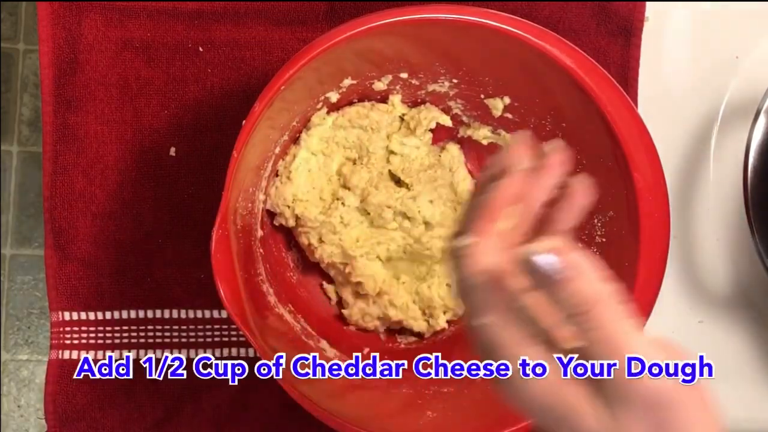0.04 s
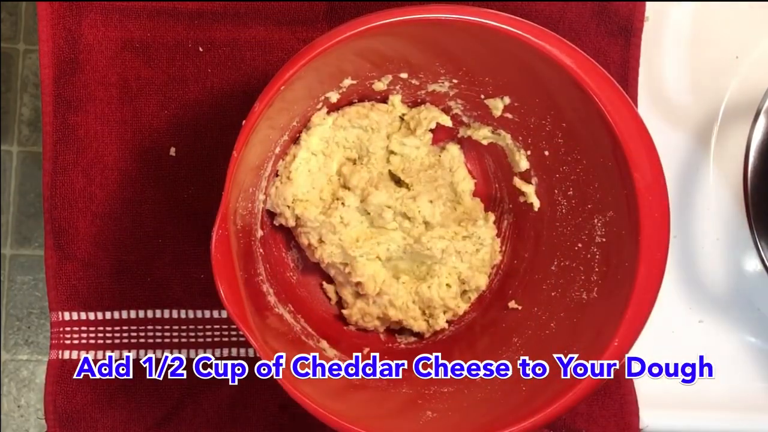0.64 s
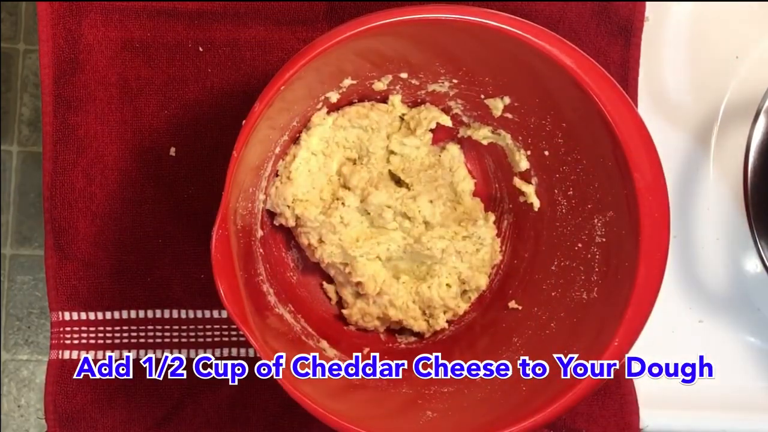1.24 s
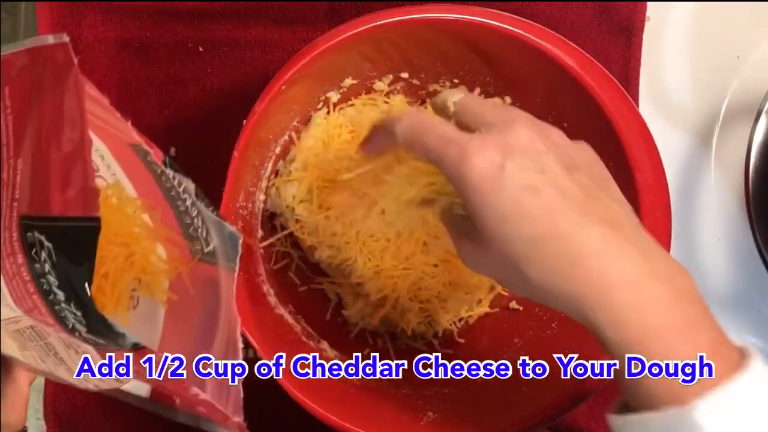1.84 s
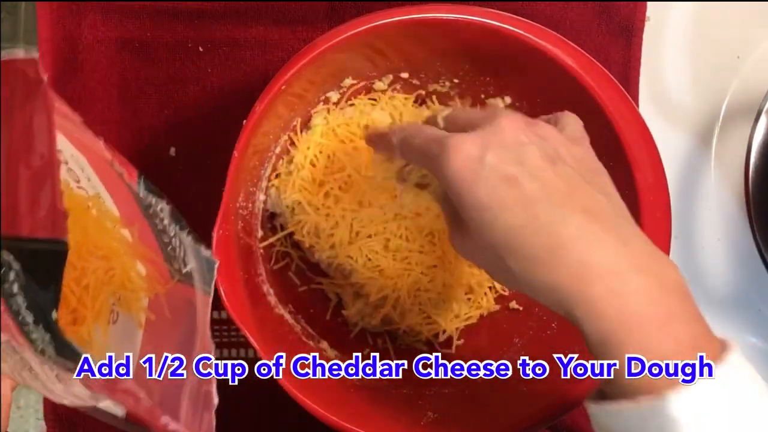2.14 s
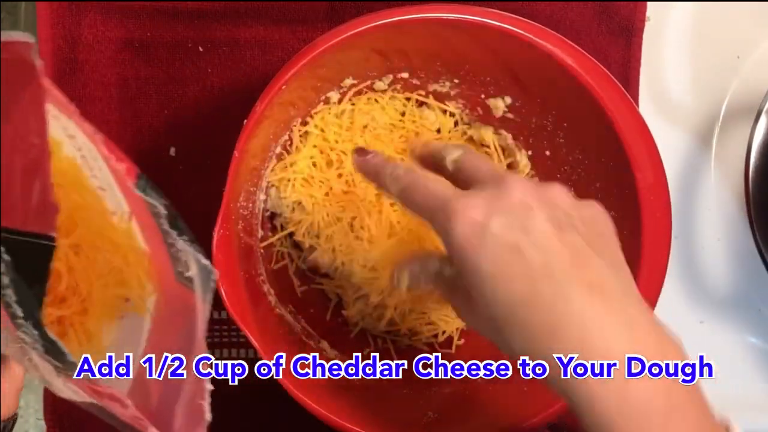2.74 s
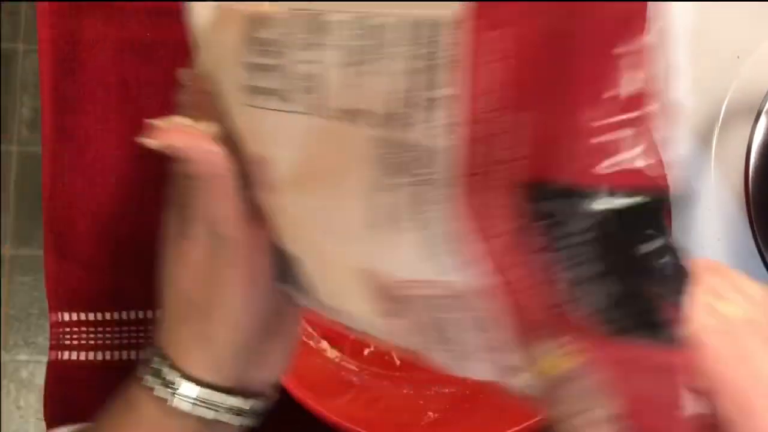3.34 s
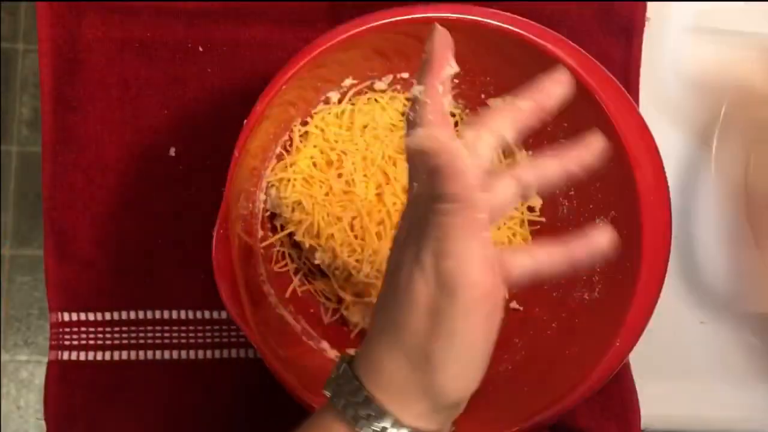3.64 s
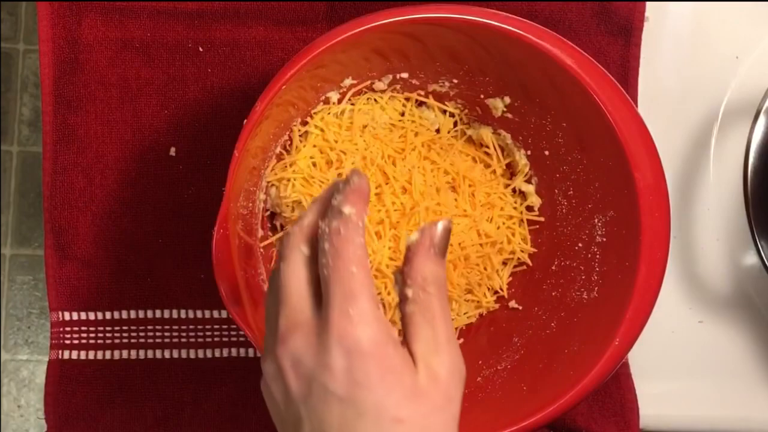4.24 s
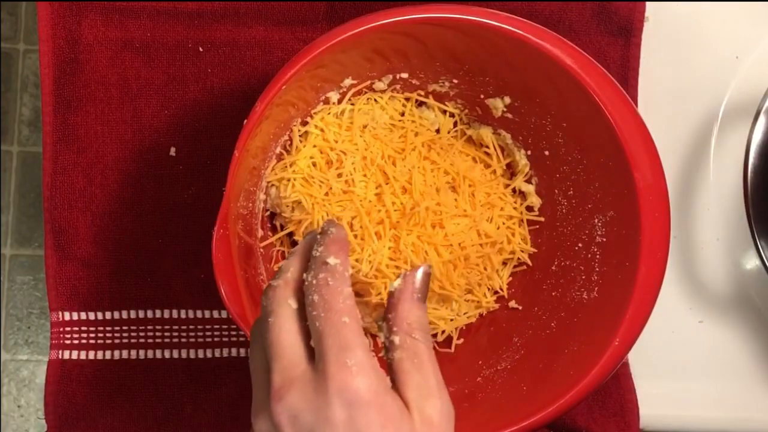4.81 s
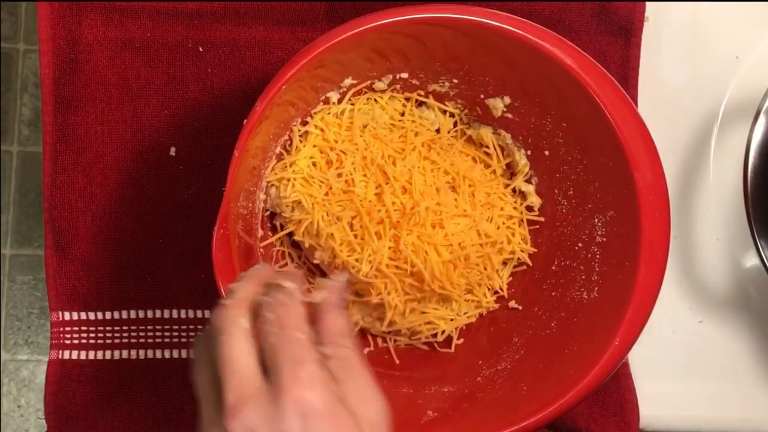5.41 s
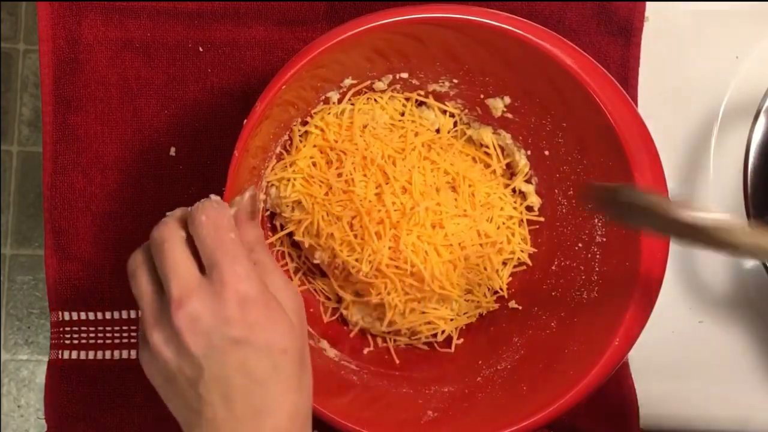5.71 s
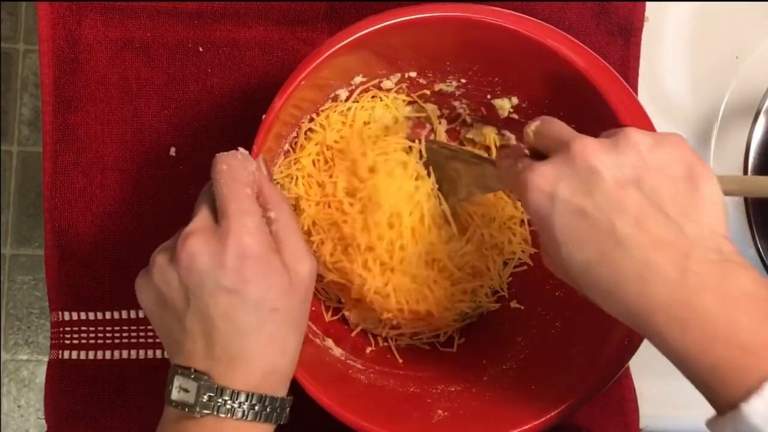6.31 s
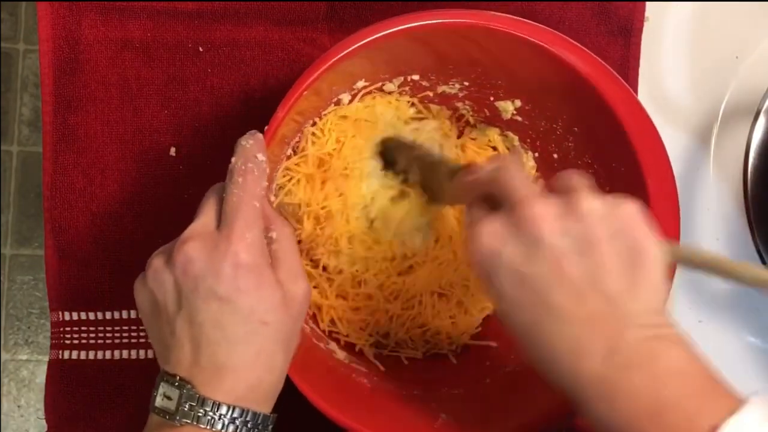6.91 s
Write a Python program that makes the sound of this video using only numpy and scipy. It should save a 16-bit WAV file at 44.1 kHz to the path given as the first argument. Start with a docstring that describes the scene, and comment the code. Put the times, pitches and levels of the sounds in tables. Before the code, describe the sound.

In a small, quiet kitchen, something is set down hard on a counter. Fingers spread shredded cheese over dough with faint rustles and light ticks. A stiff plastic pouch then crinkles in loud, sharp snaps and drops onto the counter. After two more knocks, a wooden spoon starts through sticky dough, softly squelching and scraping a plastic bowl. The microphone is close above the bowl, with a low appliance hum underneath.

```python
"""A stiff pouch of shredded cheese buckles in sharp snaps, each a pop that sets the film shivering.
Before it, in a small quiet kitchen, something is set down hard on the ringing counter, and fingers
drop and spread soft, ticking shreds on dough in a plastic bowl. The pouch is then lifted across and
dropped on the counter. A hand takes hold of the bowl and a wooden spoon starts through the sticky
dough, squelching and scraping the wall. Room air and an appliance hum lie underneath."""
import sys
import numpy as np
from scipy import signal
from scipy.fft import rfft, irfft
from scipy.io import wavfile

SR = 44100
rng = np.random.default_rng(int(sys.argv[2]) if len(sys.argv) > 2 else 0)


def wrap_up_sound(samples):
    """Save the sound to the file named by the first command line argument, as 16-bit audio."""
    columns = np.atleast_2d(samples).T
    # keep every value between -1 and 1, then stretch to whole-number steps
    tamed = np.clip(columns, -1, 1)
    steps = np.round(tamed * 32767).astype(np.int16)
    wavfile.write(sys.argv[1], SR, steps)


N = 306936
TIME = np.arange(N) / SR

# the pouch's big buckles: (time [s], pop level [dB], pitch [Hz], attack [cycles],
# shiver level [dB], crack level [dB])
BUCKLES = [(3.2812, -40, 1150, 1.8, -32.5, -54), (3.2895, -33, 1400, 2.5, -44, -53),
           (3.3074, -16, 2480, 1.8, -19.5, -41), (3.3445, -34, 2420, 1, -38, -33),
           (3.3773, -30, 1550, 1.2, -36, -46), (3.393, -32, 1380, 1.6, -33, -48),
           (3.4038, -29, 1820, 1.4, -34, -47), (3.414, -27, 2000, 1.2, -20.5, -38),
           (3.4206, -17, 2760, 1.4, -18.5, -20.5), (3.4411, -9, 3820, 0.97, -19.5, -17),
           (3.4442, -13, 1550, .8, -20, -20.5), (3.4732, -21, 1760, 1.2, -37.5, -37),
           (3.495, -29, 2000, 1.2, -27, -39), (3.505, -14, 3300, 1.2, -22, -22.5),
           (3.5321, -17.5, 1600, 1.4, -21.5, -25.5), (3.549, -29, 1500, 1.1, -46, -48),
           (3.568, -28, 1390, 2.1, -41, -56.5), (3.574, -18.5, 2400, 1, -27.5, -25),
           (3.6067, -29, 1350, 1.3, -30, -62.5), (3.633, -18.5, 1550, 0.96, -31, -43),
           (3.6403, -30, 2000, 1.1, -26, -34), (3.6786, 2, 4700, .75, -19.5, -21),
           (3.689, -18, 3500, 0.66, -16, -20), (3.7423, -27, 2000, 1.3, -34.5, -38),
           (3.785, 2, 5170, 0.71, -17, -29), (3.8166, -26, 1950, 0.84, -25.5, -52),
           (3.8693, -31, 1120, 1.1, -34, -52), (3.9192, -39, 1170, 1.1, -30, -39),
           (3.9586, -21.5, 1370, 1.14, -26.5, -37.5), (3.999, -29, 1380, 1.5, -35.5, -45),
           (4.0135, -14, 2630, 1.6, -22, -20.5), (4.0195, -15.5, 4000, 1.8, -26, -25),
           (4.121, -16.5, 2880, 1.6, -26.5, -26), (4.1584, -25, 4240, 3.8, -24.5, -27.5),
           (4.2498, -42, 890, 1.2, -35.5, -52), (4.2935, -16.5, 3400, 2.6, -22.5, -18.5),
           (4.3125, -20, 4570, 3.7, -24.5, -23), (4.386, -37, 4840, 2, -40, -37),
           (4.415, -23, 2000, 0.71, -18, -21.5), (4.4335, -35, 3060, 1.2, -23, -27),
           (4.4742, -15, 5100, 1.7, -33, -29), (4.504, -41, 3220, 1.2, -30, -46),
           (4.534, -26.5, 4000, 2, -37, -59), (4.579, -26.5, 2540, 1.8, -26.5, -56),
           (4.627, -42, 2600, 1.5, -37.5, -61)]
# tone of the shivering film: (frequency [Hz], level [dB])
FILM_TONE = [(88, -42.5), (150, 0.5), (328, -6), (716, -2.5), (1500, 0), (1690, 1.5), (2700, 0), (2980, -2),
             (4580, -5.5), (9630, -25.5), (15100, -38), (16000, -40)]
# tone of the bright crack on top: (frequency [Hz], level [dB])
CRACK_TONE = [(2000, -21.5), (5000, 7.5), (9000, 2.5), (15000, -5)]
# the pouch's pass-by, riding the reverb send: (time [s], distance [multiples of the nearest])
POUCH_DISTANCE = [(3.28, 1.7), (3.5, 1.1), (3.75, 1), (4.12, 2), (4.3, 3.2), (4.6, 3)]

def pouch_snaps():
    """Each buckle pops and sets the sheet shivering; tight ones are brighter, distant ones have more room."""
    t, out = np.arange(2048) / SR, np.zeros(N)
    for s, pop_db, hz, cycles, shiver_db, crack_db in BUCKLES:
        shiver = noise(FILM_TONE, len(t), tilt_db=5.5 * np.log2(hz / 2000), ripple_db=3)
        shiver *= burst(t, .0001, .0062)
        crack = noise(CRACK_TONE, len(t)) * burst(t, .0001, .0043)
        buckle = amp(pop_db) * pop(t, hz, cycles, sag=.14)
        sheet = amp(shiver_db) * shiver + amp(crack_db) * crack
        distance = np.interp(s, *np.transpose(POUCH_DISTANCE))
        add(out, s, buckle + sheet)
        add(out, s, distance * kitchen(amp(-17.5) * buckle + amp(-12.5) * sheet, build_s=.0033))
    return butter(out, 2, 130, "high")  # thin film radiates little bass


# how hard the pouch is bent: (time [s], level [dB])
BENDING = [(3.26, -71), (3.34, -52), (3.47, -38), (3.65, -47), (3.88, -52), (4.04, -49), (4.26, -69),
           (4.48, -41), (4.66, -64)]
# film creasing in the hand, faint while fetched and held: (start [s], length [s], level [dB])
HANDLING = [(-.05, 0.28, -57.5), (.36, 2.55, -66), (.63, 0.25, -69), (3.13, .26, -53), (3.36, 0.46, -49),
            (3.78, 0.31, -55.5), (4.29, 0.18, -52)]
# tone of the fine creases: (frequency [Hz], level [dB])
CREASE_TONE = [(1000, -2.5), (2500, -3.5), (4500, -2.5), (7000, -6.5), (10000, -10.5), (15000, -14)]

def pouch_crinkle():
    """Between the snaps, small panels flex with low pops and fine creases crackle."""
    t, pops = np.arange(1024) / SR, np.zeros(N)
    start, end = BENDING[0][0], BENDING[-1][0]
    for when, pitch, softness in rng.random((130, 3)):
        panel = pop(t, 1100 * 3 ** pitch, cycles=1.5, sag=.4)
        add(pops, start + when * (end - start), amp(-12 * softness) * panel)
    bending = amp(np.interp(TIME, *np.transpose(BENDING))) * (TIME > start) * (TIME < end)
    crackle = grains(FILM_TONE, per_s=770, spread_db=6.5, fall_s=.00024)
    flex = bending * (amp(13) * pops + amp(.5) * crackle)
    creases = grains(CREASE_TONE, per_s=1800, spread_db=3, fall_s=.0019)
    creases *= strokes(HANDLING, rise=.043, fall=.15)
    return flex + creases + amp(-6) * kitchen(flex + creases)


# the heap shifting inside the pouch: (start [s], length [s], level [dB])
HEAP_SHIFTS = [(3.28, 0.18, -41.5), (3.46, 0.25, -44), (3.8, 0.16, -63), (4.19, .09, -54),
               (4.54, 0.19, -53.5)]
# its muffled tone: (frequency [Hz], level [dB])
HEAP_TONE = [(70, -20), (150, 3), (300, 10), (480, 1), (900, -13), (2500, -33.5)]

def cheese_slumps():
    """Loose cheese slumps in the pouch with a soft, low tumble."""
    tumble = grains(HEAP_TONE, per_s=400, spread_db=1.5, fall_s=.006, count=6)
    return strokes(HEAP_SHIFTS, rise=.12, fall=.91) * tumble


# hits on the counter and the bowl standing on it: (time [s], thud level [dB], hardness as cutoff [Hz],
# ring level [dB], ring time [factor, low under a resting hand])
HITS = [(0.1929, -22, 3720, -25, .6), (.196, -32.5, 2900, -22, 0.44), (0.2083, -18.5, 670, -18, 0.7),
        (0.467, -43, 686, -53, 0.7), (.545, -39, 600, -45.5, 0.54), (0.649, -47.5, 2240, -54, 0.65),
        (2.252, -44.5, 1000, -58, 0.34), (3.44, -32, 1810, -36.5, 0.55), (4.446, -26, 1680, -53, 0.45),
        (4.461, -30, 1390, -26.5, 0.54), (4.473, -17.5, 204, -19, 0.63), (4.487, -22, 315, -34, 0.67),
        (4.9714, -35, 2870, -41.5, 0.4), (4.978, -31.5, 1380, -36.5, 0.49), (5.021, -45, 1540, -43, 0.6),
        (5.472, -22.5, 560, -24.5, 0.41)]
# the counter's ring: (frequency [Hz], level [dB], t60 [s])
COUNTER_MODES = [(172, -10, .16), (275, 1.5, .25), (350, -2, .2), (436, -14, .2), (495, -9, .21),
                 (576, -9, .18), (657, -8, .12), (856, -23, .24), (711, -11, .16), (818, -11, .15),
                 (1082, -20, .18), (1330, -11, .19), (1825, -17, .23), (1992, -7, .28), (2115, -4, .22),
                 (2200, -10, .13), (3600, -18, .16)]
# tone of the dull thud: (frequency [Hz], level [dB])
THUD_TONE = [(60, -54), (120, -19), (200, 2), (330, -1.5), (700, 0.5), (1000, -4), (1350, -6), (1700, -5),
             (2100, -5), (2700, -10.5), (5000, -22), (15000, -31.5)]
# tone of the hard contact: (frequency [Hz], level [dB])
CLICK_TONE = [(1000, -11), (2500, -0.5), (3600, 4), (4500, -5), (7500, -1), (10000, -2), (15000, -2)]

def counter_knocks():
    """A blow clicks, thuds and rings the counter; soft ones lose the click and the high modes."""
    t, out = np.arange(16384) / SR, np.zeros(N)
    for s, thud_db, hard_hz, ring_db, ring_factor in HITS:
        modes = ring(COUNTER_MODES, t, ring_factor) * (1 - np.exp(-t / .0023))
        thud = noise(THUD_TONE, len(t)) * burst(t, .0005, .014)
        body = amp(ring_db) * modes + amp(thud_db) * thud
        body = butter(body, 3, [120, hard_hz], "band")
        hardness = hard_hz / 3900
        click = noise(CLICK_TONE, len(t), cut_hz=13000 * hardness ** 3) * burst(t, .000067, .004)
        click *= amp(thud_db + 11 * np.log2(hardness))
        radiated = butter(body, 2, 650, "high")
        add(out, s, body + click)
        add(out, s, kitchen(amp(-1) * radiated + amp(-2) * click, build_s=.0023))
    return out


# fingers rubbing off crumbs, then sprinkling and spreading: (start [s], length [s], level [dB])
FINGER_STROKES = [(.06, 0.11, -59), (1.4, 0.088, -61.5), (1.52, 0.14, -55.5), (1.73, 0.33, -58.5),
                  (2.15, 0.13, -62), (2.32, 0.072, -55), (2.55, 0.57, -57)]
# tone of rustling shreds: (frequency [Hz], level [dB])
SHRED_TONE = [(410, -60), (700, -3), (760, -12), (1350, -12), (2000, -1.5), (3100, -3.5), (4210, -7.5),
              (5800, -14.5), (11600, -31.5), (15000, -59)]

def cheese_spreading():
    """Soft shreds slide over one another under the fingers, and single ones patter down."""
    slide = grains(SHRED_TONE, per_s=3200, spread_db=2.5, fall_s=.0011)
    patter = amp(-2) * grains(SHRED_TONE, per_s=40, spread_db=-1.5, fall_s=.0011)
    return strokes(FINGER_STROKES, rise=.17, fall=.13) * (slide + patter)


# the hand, then the spoon, leaning into the dough: (start [s], length [s], level [dB])
PRESSES = [(1.42, 0.91, -59), (2.42, 0.72, -53), (6.08, 0.038, -51), (6.18, .11, -51)]
# tone of yielding dough: (frequency [Hz], level [dB])
DOUGH_TONE = [(80, -56), (150, -3), (200, -1), (270, -18), (600, -13), (1500, -17), (6000, -33.5)]

def dough_rub():
    """The dough gives under pressure with a dull, low rub."""
    rub = grains(DOUGH_TONE, per_s=250, spread_db=1.5, fall_s=.0072)
    return strokes(PRESSES, rise=.26, fall=.088) * rub


# spot ticks: (time [s], level [dB], pitch [Hz], edge trim [dB])
SPOT_TICKS = [(1.3921, -34, 2830, -1), (1.4666, -39.5, 3060, -13), (1.492, -46, 3750, -3),
              (1.5352, -40, 2920, -16), (1.5425, -41, 2460, -11), (1.567, -32.5, 2330, -22),
              (1.5741, -30, 3280, -25), (1.607, -35.5, 2650, 0), (1.613, -40, 3300, -8),
              (1.6357, -34.5, 2720, -15), (1.643, -39, 3600, -9), (1.6795, -38, 2520, -16),
              (1.8855, -38.5, 2190, -10), (1.931, -40, 2900, -5), (1.9852, -45, 2440, 1),
              (2.017, -39, 2630, -16), (2.0454, -36, 2980, -23), (2.1077, -36.5, 4400, -7),
              (2.173, -30.5, 2760, -27), (2.235, -39, 2340, -18), (2.341, -41, 1930, -10),
              (2.412, -35, 2960, -1.5), (2.4188, -38.5, 1980, 6), (2.583, -34.5, 2700, -22),
              (2.881, -33, 2600, -1), (5.074, -40, 8500, -10), (6.0635, -35.5, 6900, -16),
              (6.208, -46, 7400, 3), (6.239, -40, 7000, 8), (6.3116, -44, 6000, -3), (6.358, -47, 7000, 7),
              (6.391, -37, 11000, 1), (6.439, -38, 11100, -11), (6.5197, -48, 2000, 4),
              (6.6423, -42, 9000, 7), (6.6912, -32.5, 4760, 0.5), (6.766, -40, 1360, 5),
              (6.798, -39.5, 3060, 3.5), (6.875, -43, 11000, 1), (6.9114, -38, 12000, 3),
              (6.9309, -36, 5500, 6)]
# tone of wet threads and shreds parting, here and under the spoon: (frequency [Hz], level [dB])
THREAD_TONE = [(1000, 3), (4500, -1.5), (10000, -1), (15000, -10)]

def small_ticks():
    """Shreds, pouch and dough tick: a tiny pop with a crisp rustle and a dry, bright edge."""
    t, out = np.arange(1024) / SR, np.zeros(N)
    for s, db, hz, edge_db in SPOT_TICKS:
        rustle = amp(-8.5) * noise(SHRED_TONE, len(t), tilt_db=3, ripple_db=3) * burst(t, .0001, .0025)
        edge = amp(edge_db - 3) * noise(THREAD_TONE, len(t)) * burst(t, .0001, .0018)
        tick = amp(db) * (pop(t, hz, cycles=1.05, sag=.25) + rustle + edge)
        add(out, s, tick)
        add(out, s, amp(-4.5) * kitchen(tick, build_s=.0017))
    return out


# the stirring: (start [s], length [s], push level [dB], crackle level [dB])
SPOON_STROKES = [(6.05, 0.48, -52, -60.5), (6.65, 0.43, -56.5, -59.5)]
# tone of wood pushing dough: (frequency [Hz], level [dB])
PUSH_TONE = [(150, -3.5), (250, 0.5), (400, -26), (600, -8), (800, -7.5), (1100, -3), (1400, -8.5),
             (2300, -6.5), (3000, -5), (6000, -11.5), (15000, -14)]

def spoon_stirring():
    """Wood pushes through the dough while tiny wet threads part and air pockets smack open."""
    push = grains(PUSH_TONE, per_s=4000, spread_db=3, fall_s=.0019)
    push *= strokes(SPOON_STROKES, rise=.22, fall=.45, widen_s=.08)
    threads = grains(THREAD_TONE, per_s=2600, spread_db=2.8, fall_s=.00024)
    smacks = amp(-1.5) * grains(THREAD_TONE, per_s=31, spread_db=-3, fall_s=.00058)
    return push + strokes(SPOON_STROKES, rise=.13, fall=.16, column=3) * (threads + smacks)


# the spoon dragging along the wall: (time [s], favoured pitch [Hz], level [dB])
WALL_DRAG = [(6.02, 600, -59), (6.09, 560, -60.5), (6.2, 515, -59), (6.26, 750, -58), (6.32, 2100, -55),
             (6.41, 2300, -62.5), (6.52, 2200, -74), (6.7, 1800, -68), (6.78, 1020, -65), (6.95, 1500, -81)]
# tone of its sticky chatter: (frequency [Hz], level [dB])
CHATTER_TONE = [(1000, -5.5), (2500, 5), (4500, 5.5), (7000, 12.5), (10000, 10), (15000, 5)]
# the plastic bowl's short ring: (frequency [Hz], level [dB], t60 [s])
BOWL_MODES = [(480, -3, .04), (587, 0, .035), (964, -2, .025), (1550, -9, .022), (2190, 1, .07),
              (3200, -7, .02)]

def bowl_scrape():
    """Chattering wood excites the bowl's low modes first and higher ones as it slides up the wall."""
    t, out = np.arange(4096) / SR, np.zeros(N)
    s, favoured_hz, db = np.transpose(WALL_DRAG)
    octave, reach_octaves = np.interp(TIME, s, np.log2(favoured_hz)), .98
    chatter = grains(CHATTER_TONE, per_s=700, spread_db=2.5, fall_s=.00082, count=6)
    for hz, mode_db, t60 in BOWL_MODES:
        mode = unit(signal.oaconvolve(chatter, ring([(hz, 0, t60)], t))[:N])
        out += amp(mode_db) * mode / (1 + ((np.log2(hz) - octave) / reach_octaves) ** 4)
    return out * amp(np.interp(TIME, s, db)) * (TIME > s[0])


# wet dough peeling off the spoon: (start [s], length [s], level [dB], pocket pitch [Hz])
PEELS = [(6.081, 0.023, -44, 1960), (6.115, .035, -51, 3300), (6.225, .03, -67, 4500),
         (6.674, 0.03, -47, 2180), (6.693, 0.026, -46.5, 1770), (6.796, .035, -63, 2200),
         (6.895, 0.043, -51, 4300)]

def dough_squelches():
    """A clump of tiny wet clicks sounds through an air pocket whose pitch sinks as it opens."""
    t, out = np.arange(4096) / SR, np.zeros(N)
    clicks_per_s, glide_octaves = 1500, -.17
    for s, length, db, hz in PEELS:
        opening = np.minimum(t / length, 1)
        clicks = rng.standard_normal(len(t)) * (rng.random(len(t)) < clicks_per_s / SR)
        pitch = hz * 2 ** (glide_octaves * (opening - .5))
        pocket = unit(resonate(np.diff(clicks, prepend=0), pitch, width_hz=470))
        add(out, s, amp(db) * pocket * np.sin(np.pi * opening ** .29))
    return out


# reverb time of the kitchen: (frequency [Hz], t60 [s])
KITCHEN_DECAY = [(150, .36), (400, .38), (1000, .36), (2800, .32), (7000, .3), (15000, .2)]

def kitchen(x, build_s=.0081):
    """Dense reflections, each band dying at its own speed; every call draws a new pattern."""
    size = SR // 2
    taps = rng.standard_normal(size) * (rng.random(size) < .15)
    hz, t, bands = signal.stft(taps, SR, nperseg=256)
    decay = amp(-60 * t / read(KITCHEN_DECAY, hz)[:, None])
    tail = signal.istft(bands * decay, SR, nperseg=256)[1][:size]
    tail *= 1 - np.exp(-(np.arange(size) / SR / build_s) ** 2)
    return signal.oaconvolve(x, tail / np.linalg.norm(tail))[:N]


# the bed of room air: (frequency [Hz], level [dB])
AIR_TONE = [(15, -39), (25, -9), (87, 1), (249, -9), (301, -7), (503, -13), (863, -16), (936, -18),
            (1070, -17), (2160, -20), (2690, -24), (4370, -25.5), (11300, -35.5), (14800, -33.5),
            (16000, -37)]

def room_tone():
    """Room air and the low, wavering hum of an appliance."""
    drift = unit(np.interp(TIME, np.linspace(0, TIME[-1], 60), rng.standard_normal(60)))
    hum_hz = 68.4 + 2.79 * drift
    hum = unit(np.sin(2 * np.pi * np.cumsum(hum_hz) / SR))
    return amp(-53.3) * noise(AIR_TONE, N) + amp(-62) * hum


def amp(db):
    """Decibels to gain."""
    return 10 ** (np.asarray(db) / 20)


def unit(x):
    """Scales to rms 1."""
    return x / np.sqrt(np.mean(x ** 2) + 1e-20)


def read(points, hz):
    """Reads a table on a log-frequency axis."""
    f, value = np.transpose(points)
    return np.interp(np.log(hz + 1), np.log(f + 1), value)


def add(mix, s, sound):
    """Mixes a sound in at time s."""
    part = mix[round(s * SR):][:len(sound)]
    part += sound[:len(part)]


def butter(x, order, hz, kind):
    """A filter with a flat passband."""
    return signal.sosfilt(signal.butter(order, hz, kind, fs=SR, output="sos"), x)


def noise(tone, size, tilt_db=0, cut_hz=150000, ripple_db=0):
    """Coloured noise of rms 1 with a tilt per octave, a soft top and chance resonances."""
    hz = np.fft.rfftfreq(size, 1 / SR)
    ripple = np.interp(hz, np.geomspace(600, 16000, 28), rng.standard_normal(28))
    colour = amp(read(tone, hz) + tilt_db * np.log2(1 + hz / 1000) + ripple_db * ripple)
    colour /= np.sqrt(1 + (hz / cut_hz) ** 4)
    return unit(irfft(rfft(rng.standard_normal(size)) * colour, size))


def burst(t, rise_s, fall_s):
    """A quick attack and an exponential decay."""
    return (1 - np.exp(-t / rise_s)) * np.exp(-t / fall_s)


def pop(t, hz, cycles, sag):
    """A few cycles whose pitch sags, as slow bending waves arrive after the fast ones."""
    u = t * hz / cycles  # 1 at the envelope's peak
    pitch = hz * (1 - sag * u / (u + 4))
    return u * np.exp(1 - u) * np.sin(2 * np.pi * np.cumsum(pitch) / SR)


def grains(tone, per_s, spread_db, fall_s, count=16):
    """A random patter of tiny uneven bursts in count kinds, each with its own resonances; rms 1."""
    t, out = np.arange(512) / SR, np.zeros(N)
    sizes = amp(spread_db * np.minimum(rng.exponential(1, N), 3.5))
    triggers = sizes * (rng.random(N) < per_s / SR)
    kind = rng.integers(0, count, N)
    for k in range(count):
        grain = noise(tone, len(t), ripple_db=3) * burst(t, fall_s / 8, fall_s)
        out += signal.oaconvolve(triggers * (kind == k), grain)[:N]
    return unit(out)


def strokes(rows, rise, fall, column=2, widen_s=0):
    """Gain over time: each stroke fades in and out; rise and fall are shares of its length."""
    gain = np.zeros(N)
    for row in rows:
        progress = (TIME - row[0] + widen_s) / (row[1] + 2 * widen_s)
        gain += amp(row[column]) * np.clip(np.minimum(progress / rise, (1 - progress) / fall), 0, 1)
    return gain


def ring(modes, t, factor=1):
    """The dying modes of a struck object; factor scales their ring time."""
    hz, db, t60 = np.transpose(modes)[:, :, None]
    return (amp(db - 60 * t / (t60 * factor)) * np.sin(2 * np.pi * hz * t)).sum(0)


def resonate(x, hz, width_hz):
    """A resonance of gain 1 that follows a pitch curve."""
    turn = np.exp(2j * np.pi * np.cumsum(hz) / SR)
    pole = np.exp(-np.pi * width_hz / SR)
    return 2 * (turn * signal.lfilter([1 - pole], [1, -pole], x / turn)).real


def scene():
    """The mono mix, heard from above the bowl; the soft layers share one reverb."""
    soft = cheese_spreading() + dough_rub()
    soft += spoon_stirring() + bowl_scrape() + dough_squelches() + cheese_slumps()
    sharp = pouch_snaps() + pouch_crinkle() + counter_knocks() + small_ticks()
    return (sharp + soft + amp(-4.5) * kitchen(soft) + room_tone())[None]


def record(dry):
    """Cuts the deepest bass, clips any peak at full scale and rolls off above 16 kHz."""
    clipped = np.clip(butter(dry, 4, 48, "high"), -1, 1)
    lowpass = signal.firwin(511, 16000, window=("kaiser", 9), fs=SR)
    return signal.oaconvolve(clipped, lowpass[None], "same")


dry = scene()
out = record(dry)
wrap_up_sound(out)
```